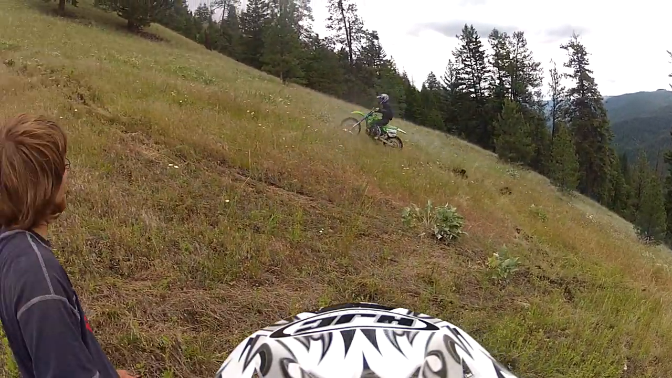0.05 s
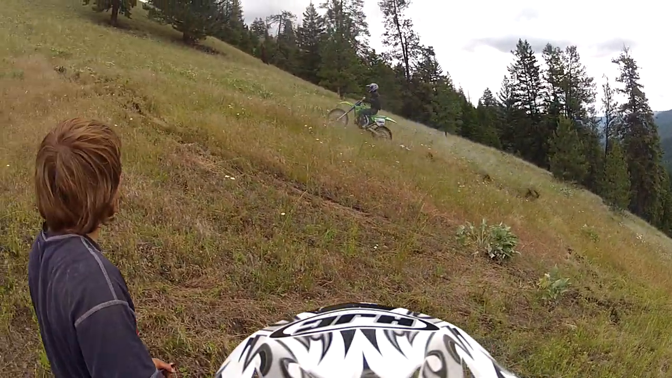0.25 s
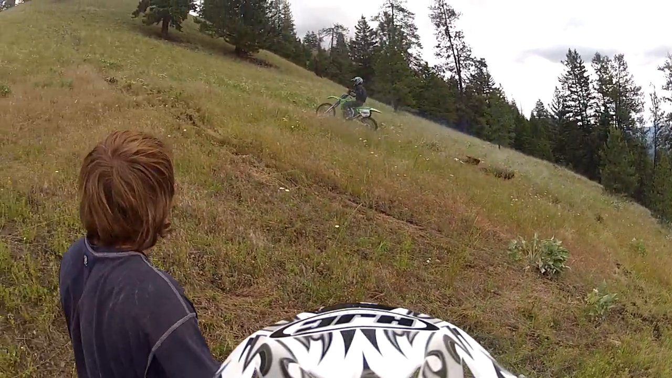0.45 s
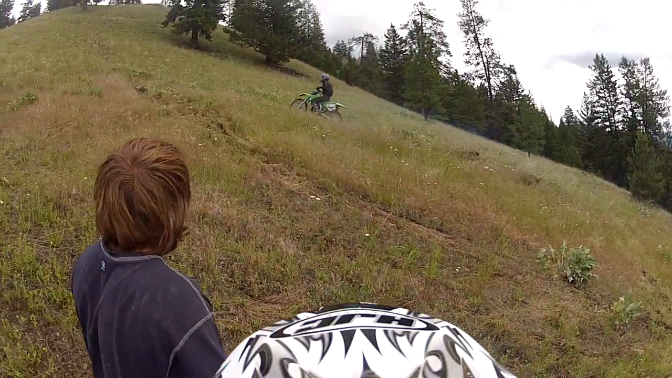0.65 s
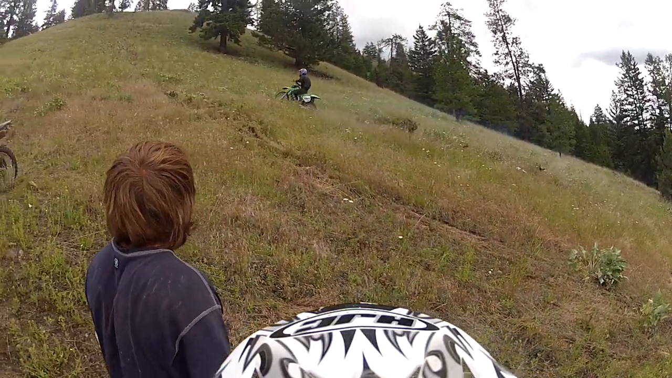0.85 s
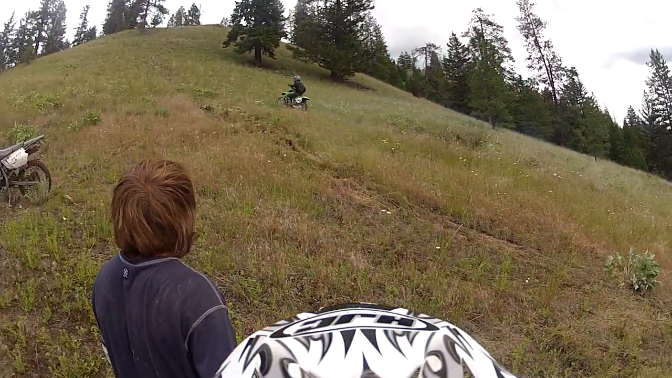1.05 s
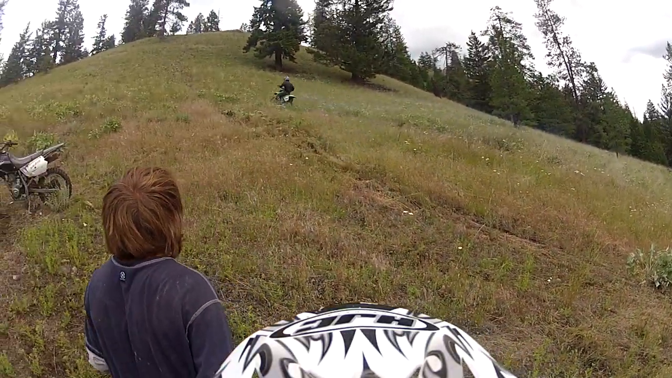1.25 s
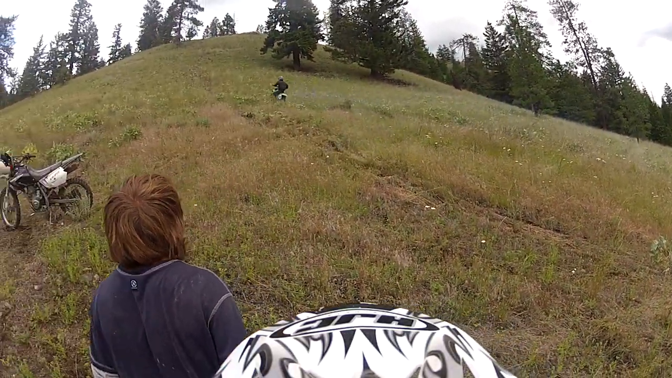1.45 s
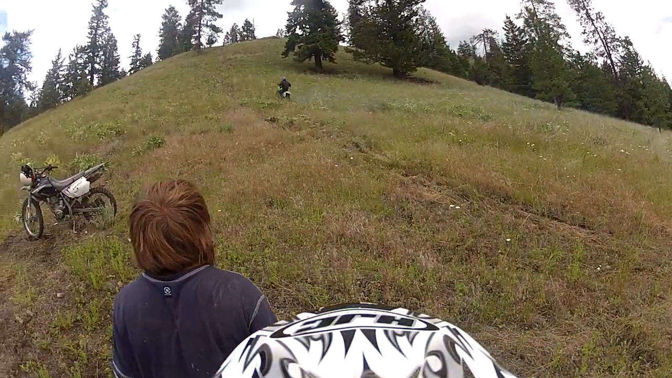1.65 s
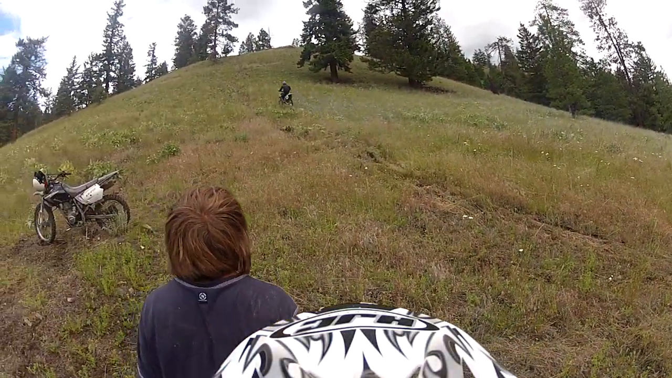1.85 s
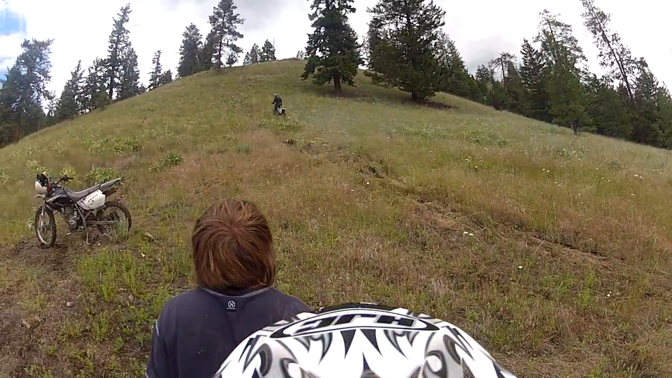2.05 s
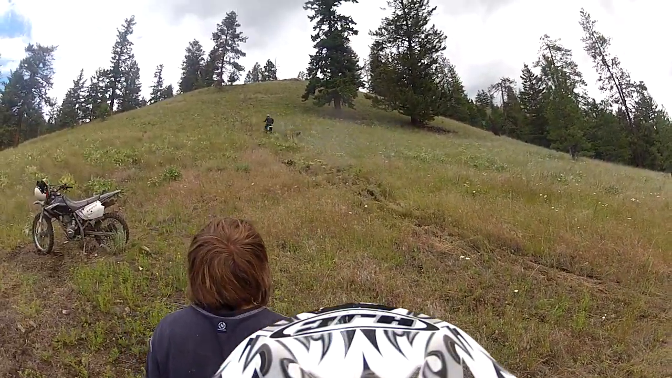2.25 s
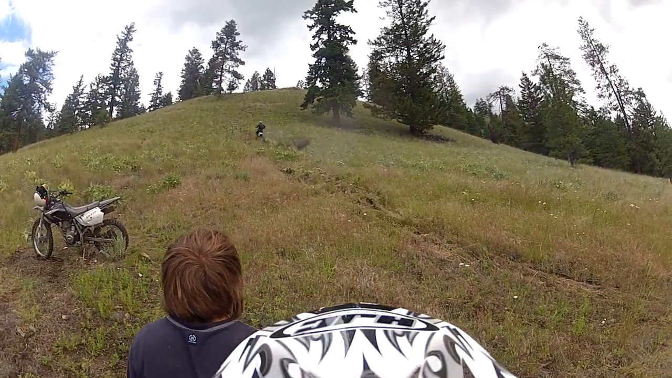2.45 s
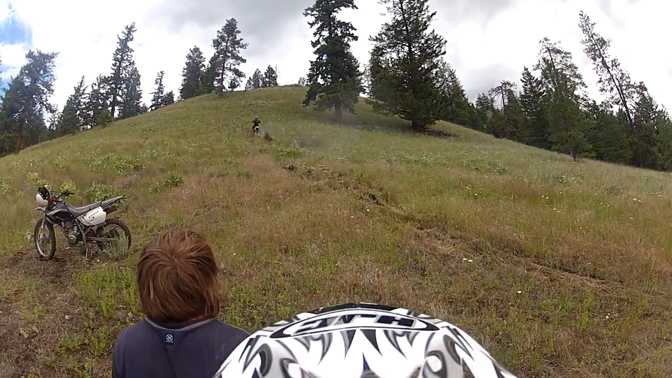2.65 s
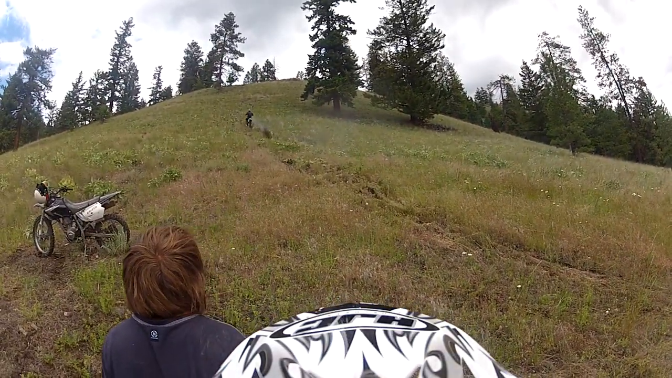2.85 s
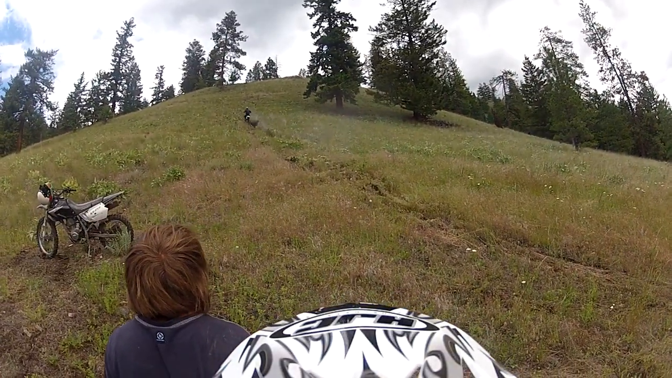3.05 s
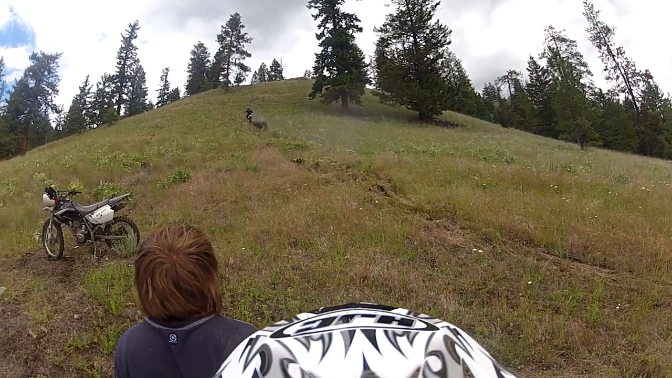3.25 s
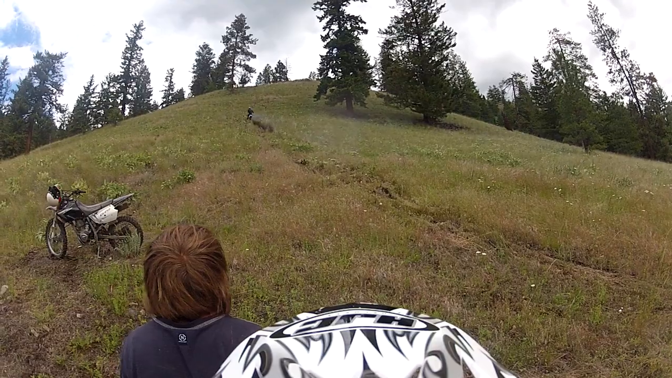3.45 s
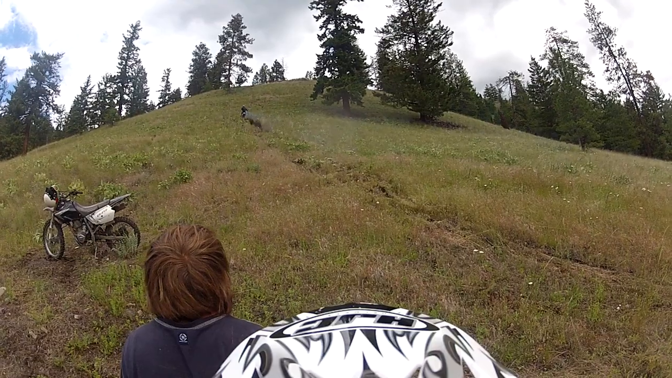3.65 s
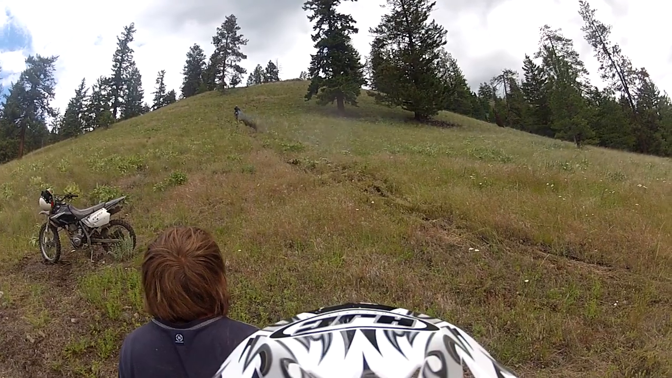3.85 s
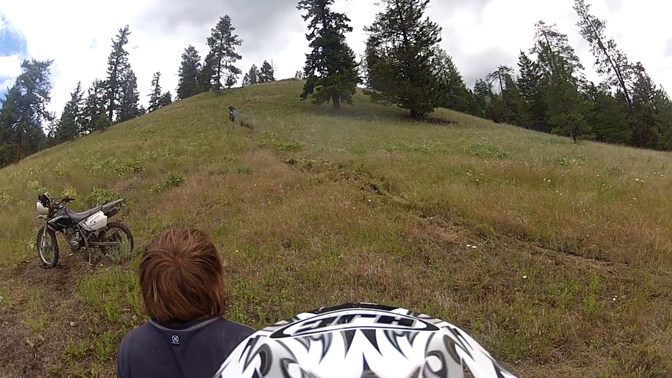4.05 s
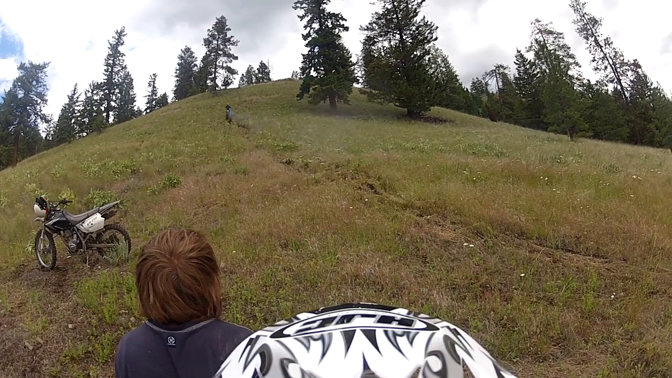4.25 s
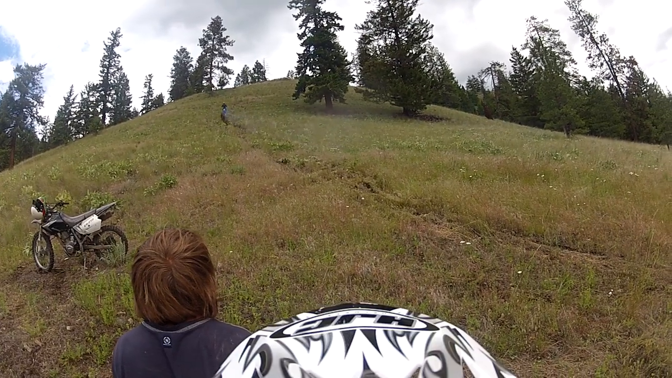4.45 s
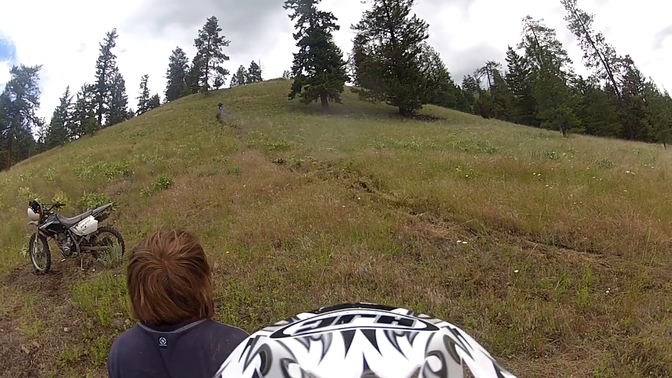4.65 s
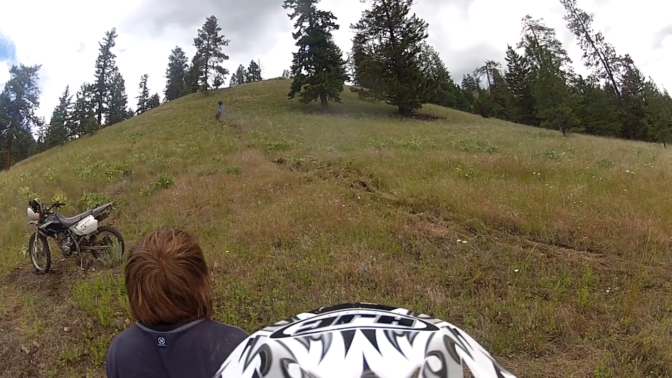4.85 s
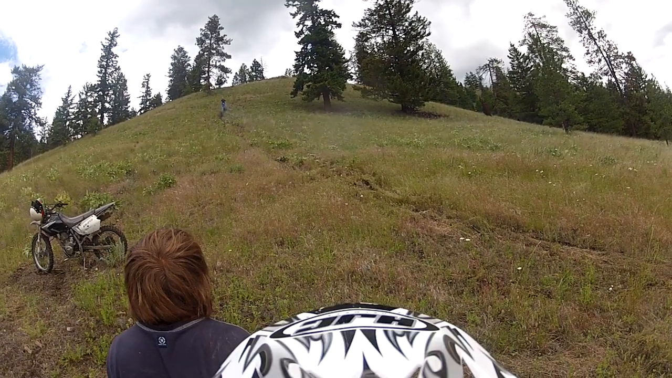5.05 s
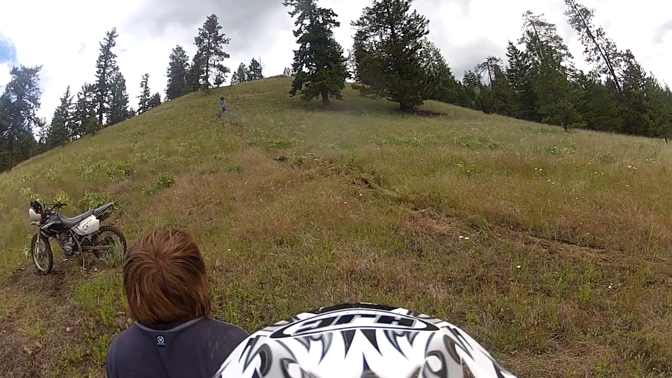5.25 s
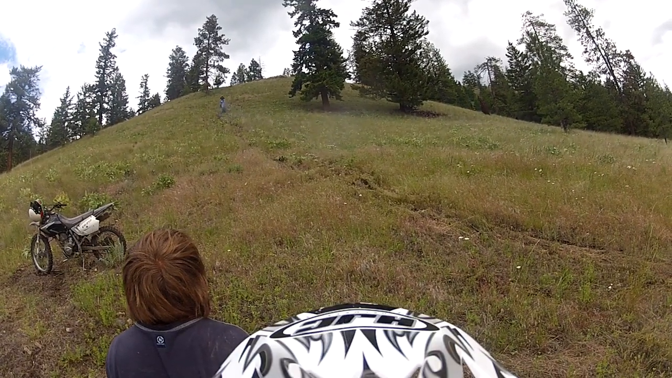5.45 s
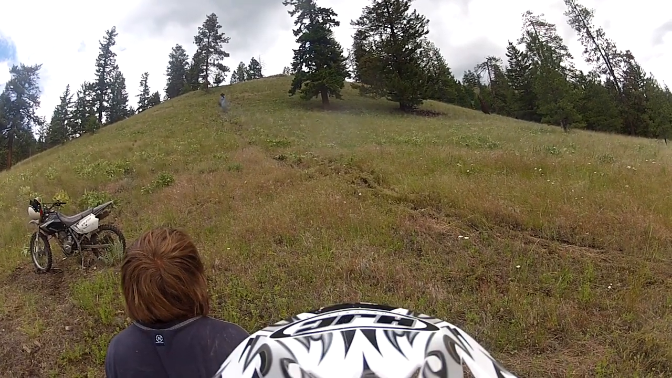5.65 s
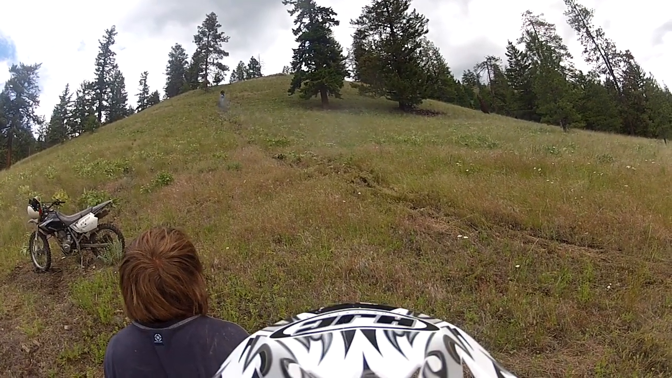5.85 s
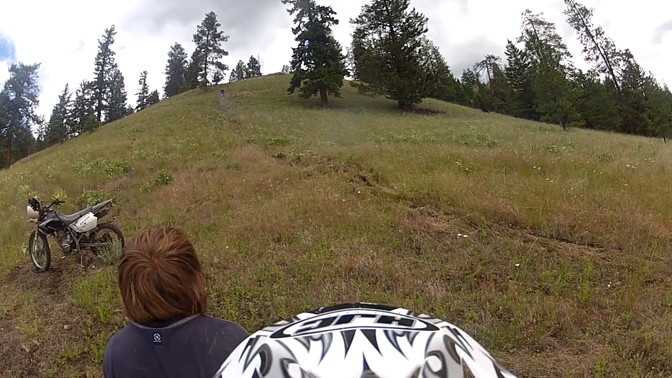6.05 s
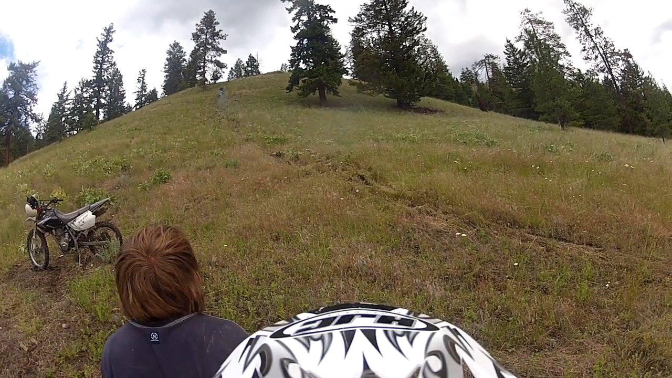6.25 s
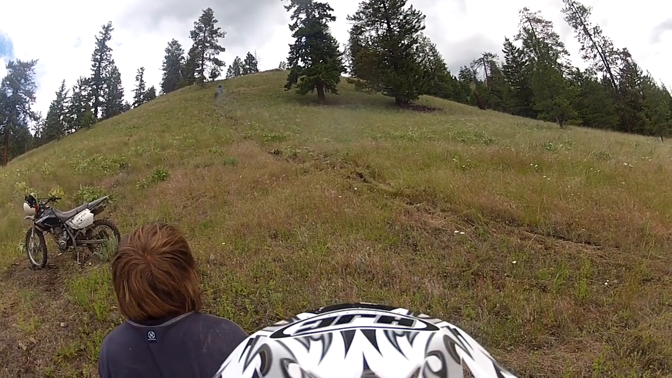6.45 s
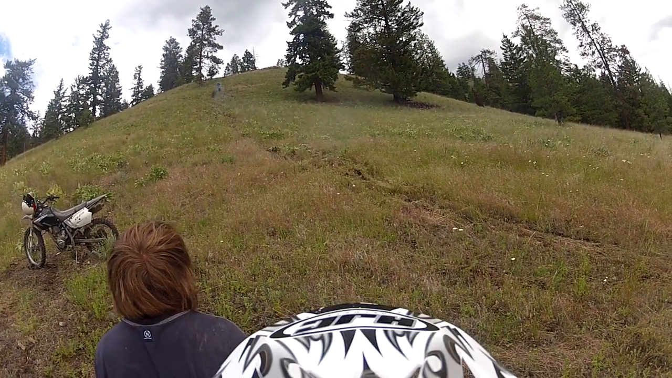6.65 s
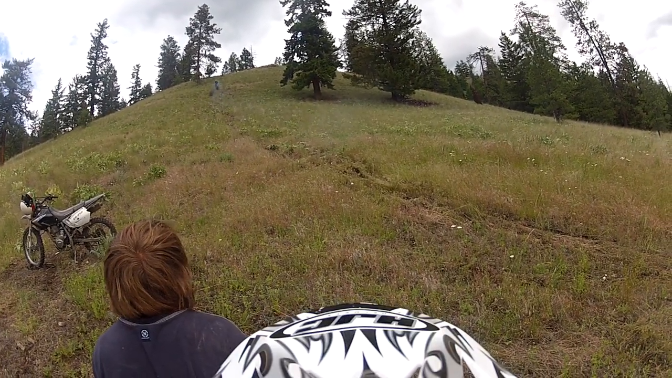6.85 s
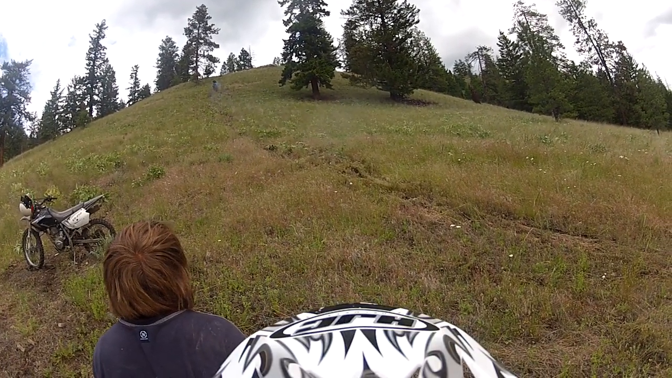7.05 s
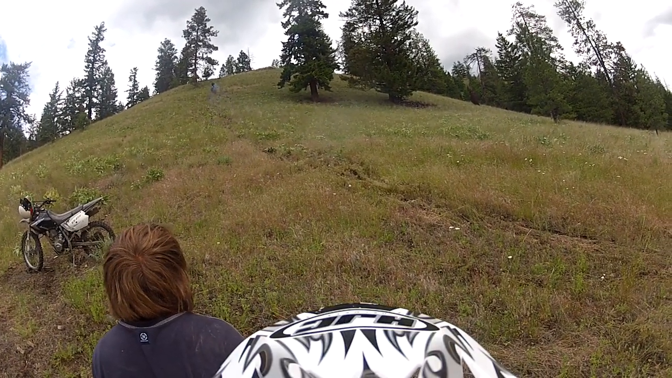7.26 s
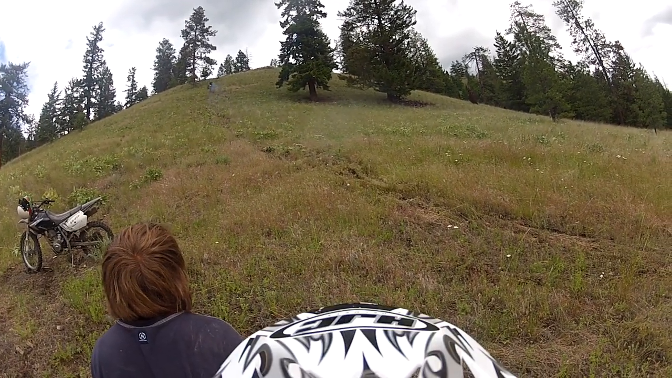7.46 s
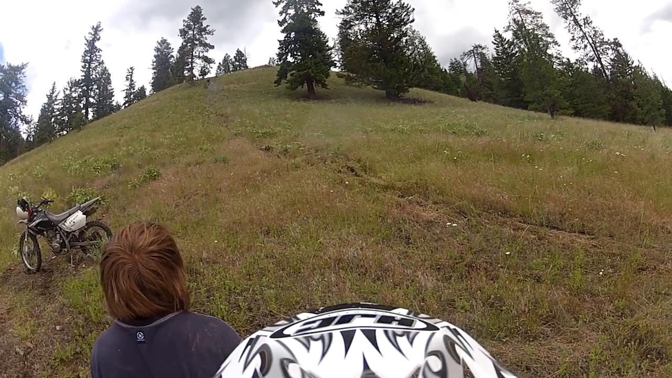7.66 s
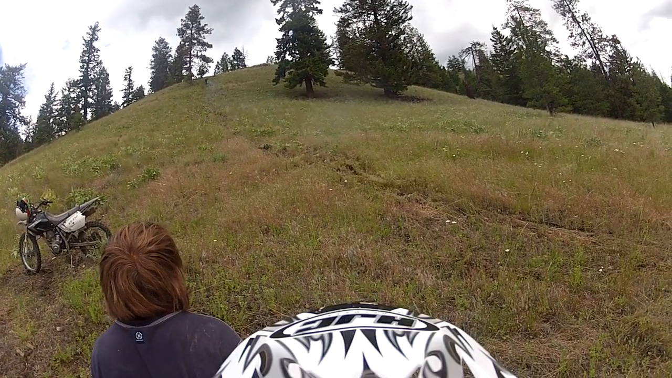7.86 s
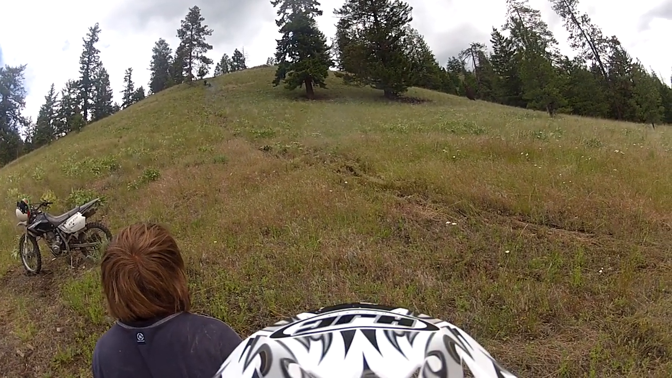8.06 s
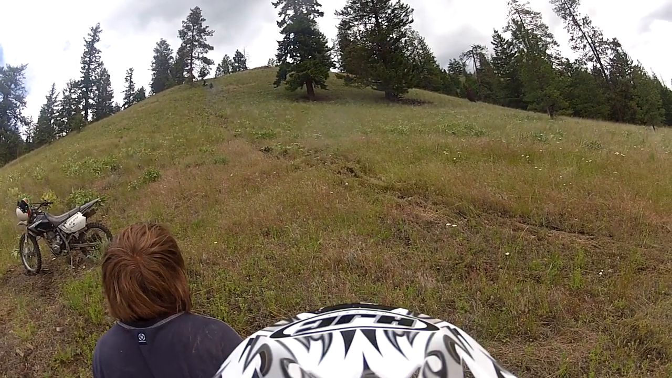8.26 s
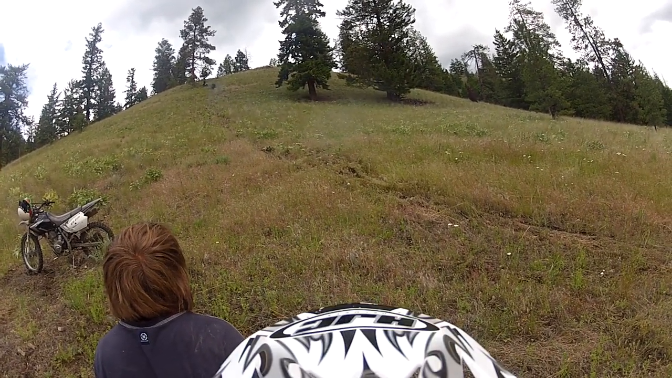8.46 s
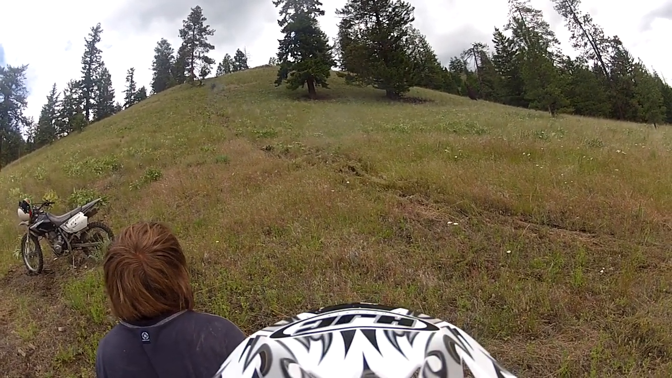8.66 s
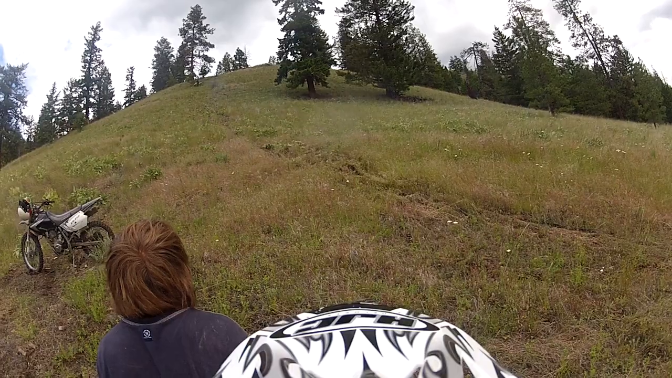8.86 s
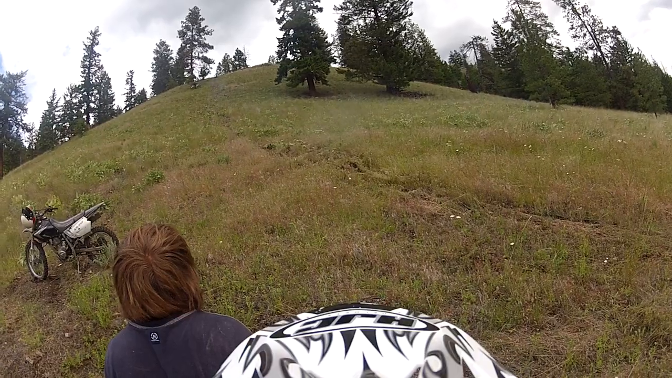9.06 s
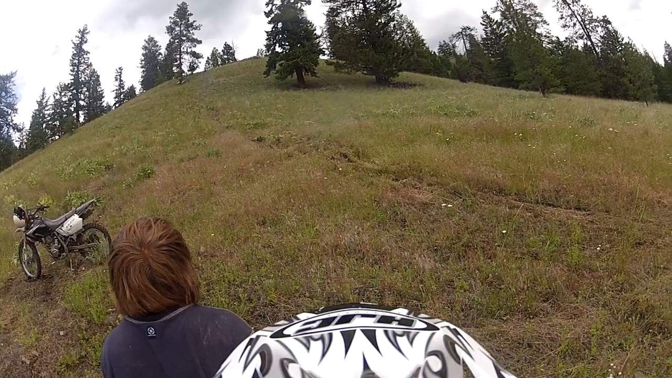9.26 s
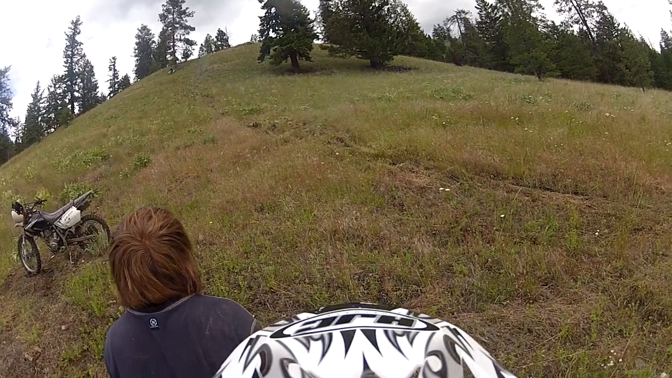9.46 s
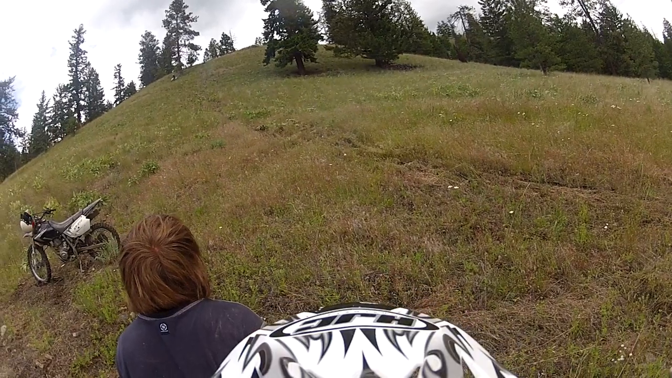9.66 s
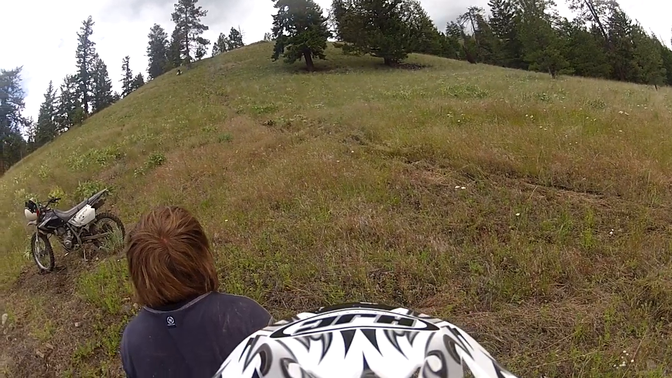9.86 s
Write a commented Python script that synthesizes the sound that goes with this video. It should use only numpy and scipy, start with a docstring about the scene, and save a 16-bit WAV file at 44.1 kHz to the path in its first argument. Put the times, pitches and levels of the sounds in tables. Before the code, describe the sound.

A dirt bike revs away up a hill, its pitch swinging with the throttle, then drops to a faint putter before a close knock.

```python
"""On a grassy hill, a single-cylinder dirt bike climbs away with its throttle pumping, blips twice and
drops to a putter beyond the crest. Its firings form a pulse train that excites the resonances of the
exhaust; distance and reflection off the slope thin the sound. Trees return a faint echo, a light wind
blows and grass rustles. Near the helmet camera something knocks and scrapes, ringing like a hard shell,
and a periodic timing error in the camera adds a thin sizzle around 12 kHz."""
import sys
import numpy as np
from scipy import signal
from scipy.fft import rfft, irfft, next_fast_len
from scipy.io import wavfile
from scipy.ndimage import uniform_filter1d, map_coordinates

SR = 44100
rng = np.random.default_rng(int(sys.argv[2]) if len(sys.argv) > 2 else 0)


def wrap_up_sound(samples):
    """Save the sound to the file named by the first command line argument, as 16-bit audio."""
    columns = np.atleast_2d(samples).T
    # keep every value between -1 and 1, then stretch to whole-number steps
    tamed = np.clip(columns, -1, 1)
    steps = np.round(tamed * 32767).astype(np.int16)
    wavfile.write(sys.argv[1], SR, steps)


N = 437031
CRUISE_HZ = 120  # reference firing rate for the engine's levels

# Firing rate, swinging with the throttle: t/s, f/Hz
FIRING_RATE = [(0.0, 131.1), (0.053, 113.0), (0.102, 125.2), (0.389, 130.6), (0.454, 150.1), (0.491, 118.8),
               (0.587, 139.5), (0.621, 120.8), (0.723, 152.8), (0.778, 119.4), (0.858, 112.6),
               (0.955, 139.5), (1.005, 107.4), (1.098, 132.7), (1.147, 113.0), (1.266, 143.4),
               (1.322, 117.1), (1.383, 135.9), (1.432, 109.2), (1.488, 130.4), (1.734, 93.5), (1.852, 96.7),
               (1.953, 136.6), (2.179, 151.7), (2.207, 126.5), (2.349, 109.2), (2.49, 124.6),
               (2.528, 110.6), (2.731, 108.3), (2.784, 127.0), (2.882, 109.8), (3.055, 131.7),
               (3.101, 112.6), (3.281, 99.6), (3.362, 115.8), (3.487, 107.6), (3.514, 123.3), (3.632, 99.2),
               (3.729, 124.8), (3.778, 95.9), (3.878, 136.7), (3.945, 104.1), (4.042, 140.6),
               (4.133, 104.1), (4.16, 114.9), (4.277, 102.5), (4.343, 126.2), (4.369, 108.7), (4.59, 115.6),
               (4.657, 137.2), (4.791, 84.6), (4.958, 140.2), (5.028, 98.7), (5.092, 121.2), (5.237, 99.1),
               (5.335, 136.6), (5.377, 107.3), (5.429, 128.1), (5.498, 100.5), (5.572, 130.6),
               (5.621, 106.8), (5.716, 133.6), (5.767, 90.9), (5.812, 112.1), (5.858, 82.0), (5.949, 90.0),
               (6.113, 144.0), (6.158, 115.4), (6.256, 141.5), (6.292, 114.6), (6.429, 83.6),
               (6.558, 117.0), (6.673, 102.9), (6.805, 130.2), (6.857, 91.7), (6.916, 99.0), (7.026, 65.0),
               (7.227, 64.3), (7.503, 115.1), (7.613, 71.1), (7.736, 54.0), (7.978, 86.1), (8.071, 119.6),
               (8.2, 102.0)]
# Path from bike to camera: t/s, loss/dB, f/Hz of the ground interference dip
HILL_PATH = [(0, 0.5, 384), (.4, 1.5, 395), (.9, 4, 740), (1.5, 3.5, 496), (2.2, 4, 504), (2.7, 3.5, 380),
             (3.5, 5, 386), (5.5, 7.5, 298), (6.7, 8.5, 261), (8.2, 10, 250)]
# Treble, falling as the bike draws away: t/s, level/dB
TREBLE_LEVEL = [(0, -0.67), (.9, -0.04), (1.95, -1.24), (2.12, -1.5), (2.36, 0.15), (2.6, -6.5),
                (3.5, -5.5), (4.5, -11), (6.75, -10.5), (7.36, -26), (7.5, -15), (8.1, -11)]
def climb(slip=0.006, load_from_hz=70.6, load_span_hz=30.7, load_ease_s=0.057, surge_s=0.16):
    """Source and filter: one train of firings drives every voice of the engine under throttle."""
    rate, = curves(FIRING_RATE)
    loss_db, dip_hz = curves(HILL_PATH)
    treble_db, = curves(TREBLE_LEVEL)
    rate = rate * (1 + slip * wobble(27.98))  # the rear wheel slips and grips
    jitter = 0.0046 + 0.0014 * loss_db  # arrivals are less even through more moving air
    turns = np.cumsum(rate) / SR + jitter * wobble(90)
    octaves = np.log2(rate / CRUISE_HZ)
    load = uniform_filter1d(ramp((rate - load_from_hz) / load_span_hz), size=int(load_ease_s * SR))
    # a twist of the throttle lifts the revs above their running mean and hardens the exhaust
    surge_db = 2.5 * np.log2(rate / uniform_filter1d(rate, size=int(surge_s * SR)))

    def effort(db, per_octave, off_load):
        """Source strength rises with revs and load; all three terms are in decibels."""
        return amp(db + per_octave * octaves - off_load * (1 - load) + surge_db)

    # a pulse less its mean and first three harmonics leaves the sharp edge
    slow = 1 + 2 * sum(np.cos(2 * np.pi * k * turns) for k in (1, 2, 3))
    edge = unit(pulses(turns) / np.gradient(turns) - slow)
    puff = unit(np.exp(-(turns % 1)) + 0.17)  # gas flow: a decay after each firing, plus a leak
    sound = boom(turns, rate, octaves, loss_db, dip_hz)
    sound += bark(turns, rate, load, edge, puff) * effort(-19, per_octave=4.5, off_load=6.8)
    rasp_gain = effort(-28.5, 4.1, 25) * amp(0.47 * treble_db - 0.5 * loss_db + surge_db)
    sound += rasp(turns, octaves, edge, puff) * rasp_gain
    sound += hiss(turns, rate, edge, puff) * effort(-32.5, 4.9, 7.4) * amp(treble_db)
    sound += metal(edge, puff) * effort(-45, 18, 5) * amp(0.29 * treble_db)
    sound += clatter(turns, rate, edge) * effort(-30, 6.3, 14) * amp(4 * treble_db)
    sound += churn(puff) * amp(-24 - 2.8 * loss_db)
    throttle_db, = curves([(8.19, 0), (8.22, -14), (8.32, -38)])
    return sound * amp(throttle_db)


# Exhaust harmonics 1 to 3: level/dB, rise with revs/(dB per octave), multiple of the path loss
LOW_HARMONICS = [(-20.5, 17.5, 0.74), (-7, 6.5, 2.15), (-11.5, 0.8, 2.29)]
def boom(turns, rate, octaves, loss_db, dip_hz, bounce=0.77, lag_s=0.0016, flutter_db=0.67):
    """Two-path interference: the lowest harmonics combine with their reflection off the slope."""
    dip_hz = dip_hz * np.exp(0.026 * wobble(9))  # the dip shifts as the bike bucks
    total = np.zeros(N)
    for k, (db, rise_db, share) in enumerate(LOW_HARMONICS, 1):
        ground = np.abs(1 + bounce * np.exp(-1j * np.pi * k * rate / dip_hz))
        level_db = db + rise_db * octaves - share * loss_db + k * flutter_db * wobble(14)
        total += amp(level_db) * ground * np.cos(2 * np.pi * k * (turns - lag_s * rate))
    return np.sqrt(2) * total * amp(-0.2 * per_firing(turns))


# Silencer response, resonant near 540 and 760 Hz: f/Hz, level/dB
SILENCER = [(100, -24), (220, -11), (340, -4), (405, -7.5), (475, 8.5), (540, 15), (610, 12), (685, 5),
            (760, 8.5), (860, -8.5), (1100, -12.5), (1800, -59), (3500, -96)]
# Spectrum of the softer pulse off load: f/Hz, level/dB
BURBLE = [(100, 3), (240, -10.5), (320, 6), (400, -5), (520, 6), (620, 0), (750, -6.5), (850, -49),
          (1100, -32), (1800, -36), (3500, -59)]
# Directivity, or how squarely the silencer faces the camera: t/s, level/dB
DIRECTIVITY = [(0, -2), (.4, -1.5), (1.5, 2.6), (2.2, 0), (2.7, -0.1), (3.5, -2.5), (5.5, .5), (6.7, -0.4),
               (7.3, -5), (8.2, -3.6)]
def bark(turns, rate, load, edge, puff, turbulence=0.15):
    """Forced resonance: pulses and turbulent gas make the silencer bark under load and burble off load."""
    aim_db, = curves(DIRECTIVITY)
    blast = edge + turbulence * (2 - load) * puff * noise()
    pumping = unit(pulses(turns + 0.5) - rate / SR)  # the piston's pulse between firings
    barking = load ** 2
    pipe = barking * shaped(blast, SILENCER) + (1 - barking) * shaped(blast + 0.55 * pumping, BURBLE)
    return steady(over_ground(pipe, bounce=0.24, delay_s=0.0023, wander_s=0.00064)) * amp(aim_db)


# Spectrum of the crack of each firing: f/Hz, level/dB
CRACK = [(600, -22.5), (900, -3), (1100, -2.5), (1400, -2), (1550, -3), (1680, -2.5), (1800, -5.5),
         (2020, -20), (2300, -10.5), (3000, -17.5), (4500, -65), (7000, -69)]
def rasp(turns, octaves, edge, puff, brow_s=6.75, brow_fade_s=0.51):
    """Steep pressure fronts crack in the midrange until the brow of the hill casts an acoustic shadow."""
    crack = steady(over_ground(shaped(edge + 0.35 * puff * noise(), CRACK)))
    shadow_db = 4 * ramp((np.arange(N) / SR - brow_s) / brow_fade_s)
    # following acceleration, the rasp answers the throttle before the revs do
    pull_db = 0.26 * uniform_filter1d(np.gradient(octaves) * SR, size=2500)
    return crack * amp(pull_db - shadow_db + 0.1 * per_firing(turns))


# Spectrum of the escaping gas, heard from afar: f/Hz, level/dB
GAS_SPECTRUM = [(900, -27), (1600, 7), (2020, 5), (2200, -3), (2400, -8), (2600, 8), (2900, -1.5),
                (3350, 5.5), (3800, 0.5), (4600, -10), (5300, -8.5), (6200, -75), (8000, -54)]
def hiss(turns, rate, edge, puff):
    """Modulated jet noise: gas hisses out with each firing."""
    jet = puff * gas(turns, rate) + 0.6 * edge
    return steady(over_ground(shaped(jet, GAS_SPECTRUM), bounce=0.28))


# Modes of the exhaust's metal: f/Hz, bandwidth/Hz, level/dB
METAL_MODES = [(1596, 78, -1), (2236, 22, 12), (2940, 82, 0), (3324, 36, 7.5), (4970, 18, -47)]
def metal(edge, puff):
    """Modal vibration: the metal of the exhaust rings under the firings."""
    return steady(ring(edge + 0.58 * puff * noise(), METAL_MODES))


# Spectrum of the bright engine clatter: f/Hz, level/dB
CLATTER_SPECTRUM = [(700, -12.5), (1300, 12.5), (2200, 2), (3000, 2.5), (3900, 8), (4800, 1.5), (5500, -53),
                    (6500, -16), (8000, -28)]
def clatter(turns, rate, edge):
    """Broadband transients: each firing spits a short bright burst, audible only from close by."""
    spit = unit(np.exp(-(turns % 1) / 0.09) + 0.09)
    return coloured(spit * gas(turns, rate) + 0.45 * edge, CLATTER_SPECTRUM)


def churn(puff):
    """Turbulence in the pipe lays a continuous spectrum between the harmonics."""
    spectrum = [(60, -28), (200, -8), (330, -9.5), (750, -5), (1100, -22), (3000, -37)]
    return coloured(puff * noise(), spectrum)


def gas(turns, rate, change_hz=9, fresh=0.69):
    """Quasi-periodic noise: a slowly changing burst repeats at every firing, plus a fresh share."""
    bursts = rng.standard_normal((400, 1200))
    since_firing = (turns % 1) / rate * SR
    repeated = map_coordinates(bursts, [np.arange(N) / SR * change_hz, since_firing],
                               order=1, mode="mirror")
    return unit(unit(repeated) + fresh * noise())


def over_ground(x, bounce=0.3, delay_s=0.00209, wander_s=0.00056):
    """Comb filtering: the slope adds a reflection whose delay wanders as the bike bucks."""
    path = np.arange(N) - SR * (delay_s + wander_s * wobble(7))
    return x + bounce * map_coordinates(x, [path], order=1)


# Firing rate with the throttle shut: t/s, f/Hz
IDLE_FIRING_RATE = [(8.2, 100.4), (8.3, 60), (8.48, 36.75), (8.77, 41.8), (8.86, 25.7), (9.12, 31.55),
                    (9.22, 24.84), (9.75, 31.5)]
# Balance of the putter: t/s, thump level/dB, pipe level/dB
IDLE_LEVELS = [(8.2, -41.5, -58), (8.33, -50, -50), (8.43, -49, -43), (8.5, -40, -47), (8.57, -47, -51),
               (8.68, -40.5, -50), (8.84, -47.5, -50), (9.03, -47, -46.5), (9.3, -48, -57),
               (9.91, -49, -62)]
# Spectrum of the thump at idle: f/Hz, level/dB
THUMP_SPECTRUM = [(30, -27), (60, -10), (85, -10), (130, -2.5), (170, -2.5), (215, -24), (300, -37),
                  (700, -75)]
# Pop in the silencer as the throttle shuts: t/s, level/dB
FUEL_POPS = [(8.241, 2.5)]
def putter(scatter_db=1.5, jitter=0.067, turbulence=0.021):
    """Impulse excitation: slow, uneven firings thump in the pipe, and unburnt fuel pops once."""
    rate, = curves(IDLE_FIRING_RATE)
    thump_db, pipe_db = curves(IDLE_LEVELS)
    turns = np.cumsum(rate) / SR + jitter * wobble(25)
    firings = pulses(turns)
    strength = amp(scatter_db * per_firing(turns))
    thump = steady(shaped(firings, THUMP_SPECTRUM))
    flow = turbulence * (np.exp(-(turns % 1) / 0.38) + 0.44) * noise()
    pipe = steady(shaped(0.41 * firings + flow, BURBLE) + shaped(0.3 * firings + flow, SILENCER))
    onset_db, = curves([(8.15, -88), (8.21, 2.5)])
    pop = shaped(taps(FUEL_POPS), SILENCER)
    return amp(onset_db) * strength * (thump * amp(thump_db) + pipe * amp(pipe_db)) + pop


# Blow near the camera: t/s, level/dB
BLOW = [(9.748, 19.5)]
# Modes of the struck shell: f/Hz, bandwidth/Hz, level/dB
SHELL_MODES = [(321, 130, -18), (615, 350, 0), (756, 190, -18), (2020, 140, -16), (2870, 110, -9),
               (3180, 210, -10), (3660, 130, -5.5), (4840, 150, -11)]
def knock(t60=0.091, rattle=0.19):
    """Damped free vibration: a sharp blow and its dull rattle set a hard shell ringing."""
    t = np.arange(SR // 4) / SR
    blow = taps(BLOW)
    fading = signal.oaconvolve(blow, amp(-60 * t / t60))[:N]
    shake = shaped(rattle * fading * noise(), [(800, -2.5), (1300, -36), (5000, -26)])
    spectrum = [(800, -2.5), (1050, -4), (1500, -9), (2000, 15), (4000, -1.5), (6000, -26), (9000, -31)]
    return shaped(ring(blow + shake, SHELL_MODES), spectrum)


def scrape(attack_s=0.034, hold_s=0.1, release_s=0.02, fade_db_per_s=135):
    """Friction noise drives the shell's upper modes after the blow: it swells, fades, then lets go."""
    age = np.arange(N) / SR - BLOW[0][0]
    level_db = (-27.5 - 8 * ramp(1 - age / attack_s)
                - fade_db_per_s * np.maximum(age - attack_s, 0)
                - 7 * ramp((age - hold_s) / release_s))
    spectrum = [(300, -21), (800, -9.5), (1400, -17), (2000, 11), (5000, -14), (7000, -8), (11000, -20)]
    return (age > 0) * amp(level_db) * coloured(ring(noise(), SHELL_MODES), spectrum)


# Reverberation time of the forest edge: f/Hz, T60/s
TREE_DECAY = [(100, 0.72), (550, 0.36), (3000, 0.59), (8000, 0.022)]
def trees(x, delay_samples=600):
    """Diffuse reflection: the trees return a late tail, each band decaying exponentially."""
    hz, t, bands = signal.stft(rng.standard_normal(SR), SR, nperseg=256)
    decay = amp(-60 * t / along(TREE_DECAY, hz)[:, None])
    tail = signal.istft(bands * decay, SR, nperseg=256)[1]
    return signal.fftconvolve(np.pad(x, (delay_samples, 0)), tail / np.linalg.norm(tail))[:N]


# Spectrum of the breeze: f/Hz, level/dB
BREEZE_SPECTRUM = [(15, -2.5), (45, -31), (120, 3), (300, 1), (700, -5), (1100, -16.5), (2000, -19.5),
                   (3600, -20.5), (5000, -36), (6500, -47)]
# Strength of the breeze: t/s, level/dB
BREEZE_LEVEL = [(0, -19), (1.3, -30), (3, -41), (6, -42), (8.3, -43), (8.85, -48.5), (9.91, -50)]
def wind():
    """Turbulent flow over the grass makes broadband noise that swells with light gusts."""
    wind_db, = curves(BREEZE_LEVEL)
    gust_db = 1.2 * wobble(3) + 1.2 * wobble(13)
    return amp(wind_db + gust_db) * coloured(noise(), BREEZE_SPECTRUM)


# Soft bump on the helmet: t/s, level/dB
HELMET_BUMP = [(0.485, 18)]
def bump():
    """A soft impact acts as a low-passed impulse."""
    return shaped(taps(HELMET_BUMP), [(15, 8), (45, 0), (80, -13), (200, -30), (800, -74)])


# Rustles in the grass nearby: t/s, half length/s, level/dB
GRASS_RUSTLES = [(9.006, 0.082, -52.5), (9.372, 0.085, -52)]
def rustles(grain_db=4):
    """Random amplitude modulation gives short swells of noise the grain of rustling grass."""
    t = np.arange(N) / SR
    swell = sum(amp(db) * np.exp(-((t - s) / width) ** 2) for s, width, db in GRASS_RUSTLES)
    grains = noise() * amp(grain_db * wobble(250))
    spectrum = [(100, -7), (300, -1), (700, -4.5), (1100, -17), (3600, -18), (5000, -22), (6500, -34)]
    return swell * coloured(grains, spectrum)


def amp(db):
    """Decibels to gain."""
    return 10 ** (np.asarray(db) / 20)


def ramp(x):
    """x held between 0 and 1."""
    return np.clip(x, 0, 1)


def unit(x):
    """Scale to rms 1."""
    return x / np.sqrt(np.mean(x ** 2) + 1e-20)


def steady(x):
    """Hold the running rms at 1."""
    power = uniform_filter1d(uniform_filter1d(x * x, size=1500), size=1500)
    return x / np.sqrt(np.abs(power) + 1e-12)


def along(points, hz):
    """Interpolate (f/Hz, value) points on a log axis."""
    f, v = np.transpose(points)
    return np.interp(np.log(hz + 1), np.log(f + 1), v)


def curves(rows):
    """Interpolate each column after the time to one value per sample."""
    s, *cols = np.transpose(rows)
    return [np.interp(np.arange(N) / SR, s, c) for c in cols]


def noise():
    """Fresh white noise."""
    return rng.standard_normal(N)


def wobble(rate):
    """A smooth random curve, rate knots a second."""
    return map_coordinates(rng.standard_normal(int(N * rate / SR) + 4), [np.arange(N) * rate / SR])


def per_firing(turns):
    """Cycle-to-cycle variation: one normal value per firing, changing just before it."""
    values = rng.standard_normal(4000)
    return uniform_filter1d(values[(turns + 1 / 8).astype(int)], size=40)


def pulses(turns):
    """A unit pulse at each whole turn, shared between neighbouring samples."""
    distance = np.abs(turns - np.round(turns)) / np.abs(np.gradient(turns))
    return np.maximum(1 - distance, 0)


def taps(rows):
    """An impulse for each (t/s, level/dB) row."""
    s, db = np.transpose(rows)
    return np.bincount(np.round(s * SR).astype(int), amp(db), N)[:N]


def filtered(x, response):
    """Multiply the spectrum of x by a frequency response."""
    size = next_fast_len(N + SR // 2)
    return irfft(rfft(x, size) * response(np.fft.rfftfreq(size, 1 / SR)), size)[:N]


def ring(x, modes):
    """Modal superposition: x through parallel second-order resonators."""
    return filtered(x, lambda f: sum(amp(db) * 1j * f * width / (f0 * f0 - f * f + 1j * f * width)
                                     for f0, width, db in modes))


def shaped(x, spectrum, size=8192):
    """Minimum-phase filtering: folding the cepstrum gives a causal filter with this spectrum."""
    cepstrum = irfft(np.log(amp(along(spectrum, np.fft.rfftfreq(size, 1 / SR)))))
    cepstrum[1:size // 2] *= 2
    cepstrum[size // 2 + 1:] = 0
    return signal.oaconvolve(x, irfft(np.exp(rfft(cepstrum))))[:N]


def coloured(x, spectrum):
    """x shaped by a spectrum, at rms 1."""
    return unit(shaped(x, spectrum))


def scene(echo_db=-22, far_echo_db=-11):
    """Superposition of the bike, its echo (a larger share beyond the crest) and the nearby sounds."""
    climbing, idling = climb(), putter()
    echo = trees(amp(echo_db) * climbing + amp(far_echo_db) * idling)
    return (climbing + idling + echo + wind() + bump() + rustles() + knock() + scrape())[None]


def record(dry, clip_level=1.08, hardness=8, slip_samples=1.47, sizzle_hz=12000, top_hz=15400):
    """Saturation rounds the peaks; phase modulation by a timing error puts sidebands about sizzle_hz."""
    x = dry[0] / (1 + np.abs(dry[0] / clip_level) ** hardness) ** (1 / hardness)
    x = x + slip_samples * np.gradient(x) * np.cos(2 * np.pi * sizzle_hz * np.arange(N) / SR)
    return filtered(x, lambda hz: hz < top_hz)[None]


dry = scene()
out = record(dry)
wrap_up_sound(out)
```